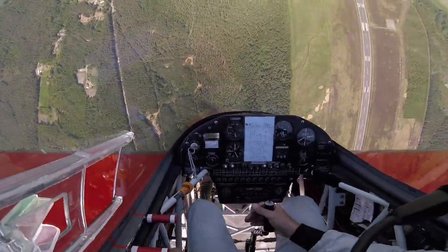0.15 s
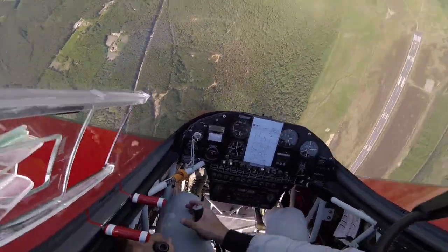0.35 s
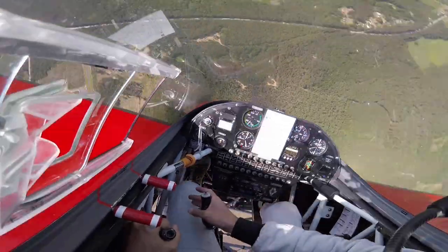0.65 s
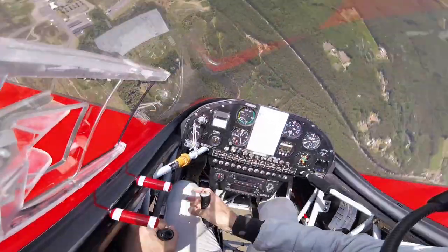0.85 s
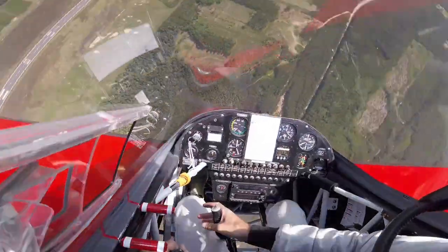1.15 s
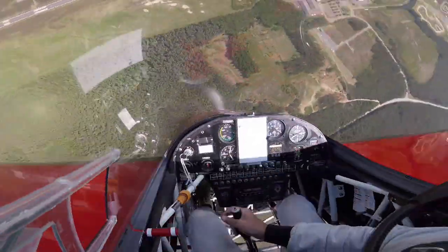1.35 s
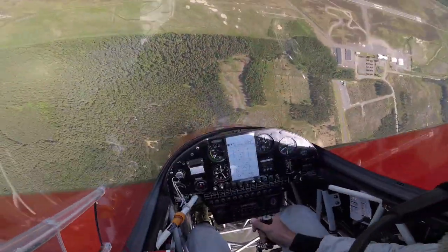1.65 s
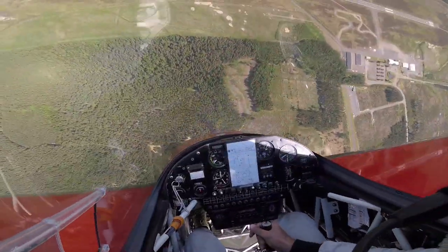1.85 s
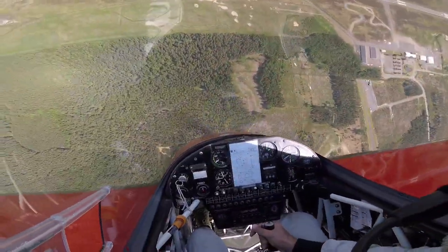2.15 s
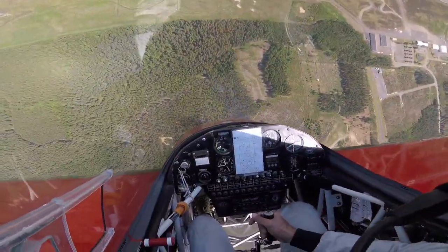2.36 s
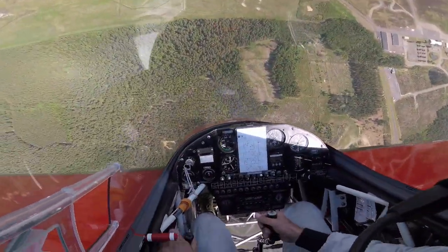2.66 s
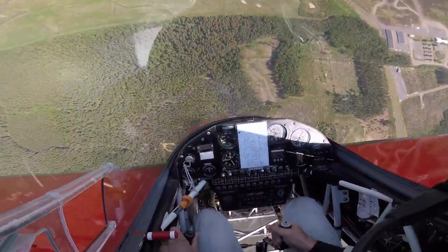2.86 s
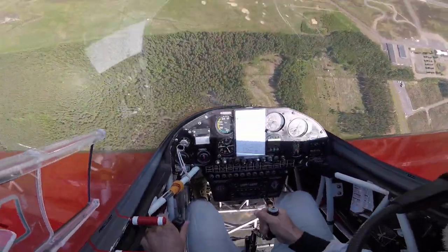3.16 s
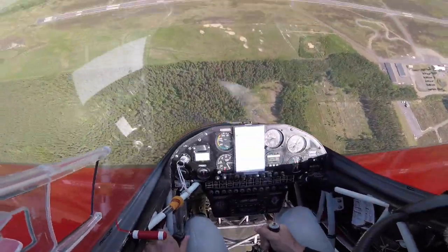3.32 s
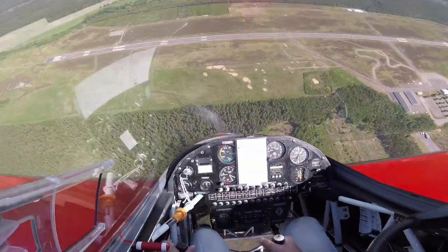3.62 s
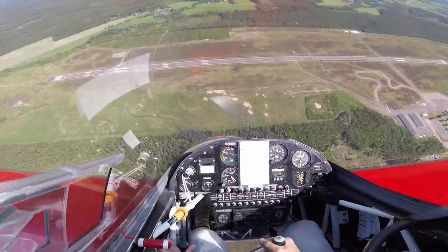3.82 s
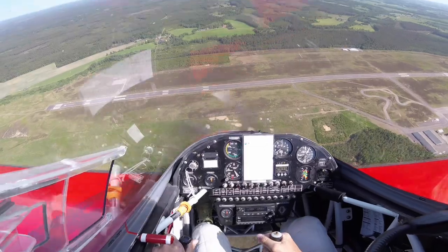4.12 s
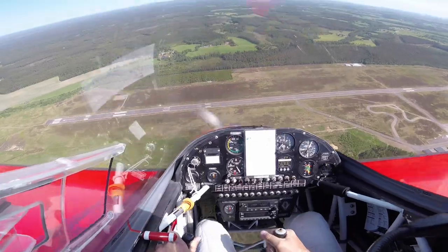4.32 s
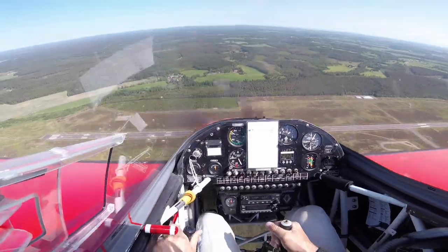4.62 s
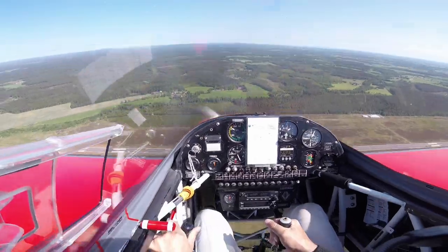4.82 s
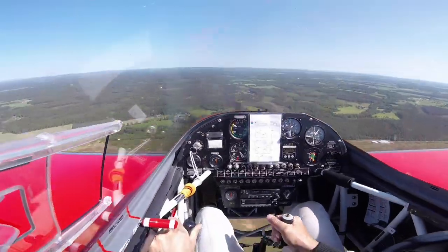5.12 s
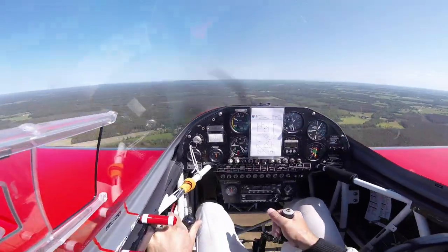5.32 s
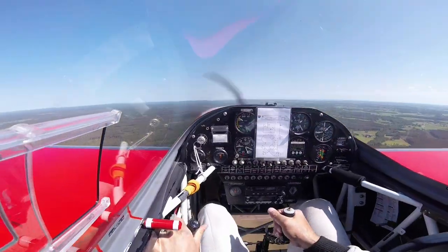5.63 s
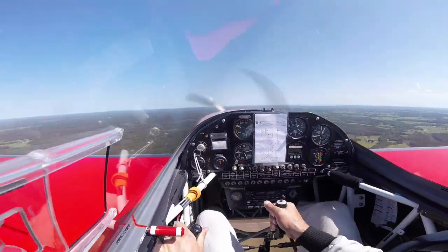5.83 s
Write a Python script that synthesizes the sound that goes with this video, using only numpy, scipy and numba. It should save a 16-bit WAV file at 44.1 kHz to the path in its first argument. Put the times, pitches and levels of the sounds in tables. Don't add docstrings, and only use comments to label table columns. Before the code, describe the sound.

Inside a small aerobatic plane, a loud low propeller drone holds nearly steady while rushing air grows and bumps rumble through the airframe.

```python
import sys
import numpy as np
from scipy import signal
from scipy.fft import rfft, irfft
from scipy.io import wavfile
from scipy.ndimage import uniform_filter1d, minimum_filter1d
from numba import njit

SR = 44100
rng = np.random.default_rng(int(sys.argv[2]) if len(sys.argv) > 2 else 0)


def transcribe(u):
    v = np.clip(np.atleast_2d(u).T, -1, 1)
    q = np.round(v * 32767).astype(np.int16)
    wavfile.write(sys.argv[1], SR, q)


def linear_from_db(decibels):
    return 10 ** (np.asarray(decibels, float) / 20)


N = 263718


def curves(table):
    time_s, *columns = np.transpose(table)
    return [np.interp(np.arange(N) / SR, time_s, column) for column in columns]


def bells(table):
    middle_s, length_s, height = np.transpose(table)[:, :, None]
    coarse = np.arange(0, N + 64, 64)
    swells = height * np.exp(-((coarse / SR - middle_s) / length_s) ** 2)
    return np.interp(np.arange(N), coarse, np.sum(swells, axis=0))


def walk(rate_hz):
    hold = int(SR / rate_hz)
    levels = np.repeat(rng.standard_normal(N // hold + 1), hold)
    return 1.193 * uniform_filter1d(uniform_filter1d(levels, hold), hold)[:N]


def wave(turns):
    return np.cos(2 * np.pi * turns)


def turbulence(shape, lo_hz, hi_hz, shared_db, own_db, rate):
    octave = np.log2(np.fft.rfftfreq(N, 1 / SR) + 1)
    pitch_hz, level_db = np.transpose(shape)
    corners = np.log2(pitch_hz)
    colour = linear_from_db(np.interp(octave, corners, level_db, left=-99, right=-99)) * rfft(rng.standard_normal(N))
    inside = (octave > np.log2(lo_hz)) & (octave < np.log2(hi_hz))
    colour = colour * N / np.sqrt(2 * np.sum(np.abs(colour[inside]) ** 2))
    swell_db = shared_db * walk(rate)
    out = 0
    for centre in np.arange(corners[0], corners[-1] + .5, .5):
        share = np.clip(1 - 2 * np.abs(octave - centre), 0, 1)
        out = out + linear_from_db(swell_db + own_db * walk(2 * rate)) * irfft(colour * share, N)
    return out


@njit
def resonance(x, hz, width):
    y, band, low = np.empty(len(x)), 0., 0.
    for i in range(len(x)):
        g, damping = np.tan(np.pi * hz[i] / SR), width[i] / hz[i]
        middle = (band + g * (x[i] - low)) / (1 + g * (g + damping))
        band = 2 * middle - band
        low = low + 2 * g * middle
        y[i] = damping * middle
    return y


# time_s, blade_rate_hz
BLADE_RATE = [(0.0, 119.81), (0.2, 123.19), (0.5, 125.08), (0.85, 123.2), (1.2, 122.88), (1.8, 122.69),
              (2.2, 123.88), (2.7, 125.41), (2.95, 124.77), (3.2, 122.25), (3.7, 122.21), (4.3, 121.74),
              (4.75, 120.92), (5.1, 120.56), (5.5, 121.49), (5.98, 122.83)]


def blade_turns():
    rate_hz = curves(BLADE_RATE)[0] * (1 + .0015 * walk(9))
    return np.cumsum(rate_hz) / SR + 0.346


# middle_s, length_s,
# strength (-0.3 # to 1, negative lifts the beat)
BUMPS = [(0.0, 0.027, -.3), (0.12, 0.093, 0.18), (0.6, 0.14, 0.7), (1.12, 0.066, 0), (1.74, .08, 0.17),
         (2.03, 0.14, 0.97), (2.4, 0.21, 0.44), (2.75, .06, 0.27), (3.45, .22, 1), (4.13, 0.094, .35),
         (4.4, 0.11, 0.36), (4.75, 0.25, 0.3), (5.25, 0.13, 0.3), (5.75, 0.21, 0.26)]


def rough_air():
    return bells(BUMPS)


# multiple_of_blade_rate, level_db, lead_turns
ENGINE_LINES = [(.5, -33, 0.12), (1.5, -38, 0.44), (4.5, -38.5, 0.66), (5.5, -38.5, 0.32), (6, -47, 0.35)]
# middle_s, length_s, depth_db
FADES = [(0.13, 0.051, -4), (0.37, .07, -6.5), (0.68, 0.045, -11.5), (1.12, 0.14, -6), (1.66, 0.1, -9.5),
         (2.12, 0.098, -17.5), (2.9, 0.16, -4.5), (3.46, 0.11, -9), (3.88, 0.092, -4), (4.75, 0.12, -4.5),
         (5.0, 0.07, -6), (5.4, .07, -2), (5.62, 0.073, -5.5), (5.98, 0.12, -2.5)]
# middle_s, length_s, gain_db
CATCHES = [
    [(0.2, .12, 7), (1.4, .35, 5), (3.3, .15, 7), (3.85, .3, 7), (5.8, .2, 5)],
    [(0.6, .4, 5), (1.25, .15, 4), (2.5, .45, 7), (3.3, .15, 4), (4.6, .3, 4)],
    [(1.0, .7, 4), (2.5, .2, 4), (3.3, .15, 4), (4.45, .3, 4), (5.5, .4, 7)],
]


def propeller(turns, bump):
    beat_db = -9.5 - 7.5 * bump + 0.36 * walk(22)
    second_db = -15.5 + bells(FADES) - 1.0
    sound = linear_from_db(beat_db) * wave(turns)
    sound = sound + linear_from_db(second_db) * wave(2 * turns - .04 + 0.089 * walk(1.4))
    lines = list(ENGINE_LINES)
    for multiple, level_db, catches in zip((3, 4, 5), (-33, -34, -36), CATCHES):
        lines.append((multiple, level_db + bells(catches) + 1.2 * walk(2.3), .4))
    flutter_db, slip_turns = 3.5, .12
    for multiple, level_db, lead in lines:
        strength = linear_from_db(level_db + flutter_db * walk(9))
        sound = sound + strength * wave(multiple * turns + lead + slip_turns * walk(5))
    return np.sqrt(2) * sound


# pitch_hz, level_db (per Hz)
BUFFET = [(70, -26), (105, -2.5), (150, 1), (215, -1.5), (290, -4), (345, -1.5), (450, -5.5), (600, -21),
          (900, -36)]


def fuselage_buffet(bump):
    return linear_from_db(-20.5 + 2 * bump) * turbulence(BUFFET, 147, 215.7, shared_db=-0.5, own_db=0.2, rate=9)


# time_s, airspeed (0 to 1), sideslip (0 to 1)
AIR = [(0.0, 0, 0.15), (0.6, 0.21, 0.03), (1.2, .25, .3), (1.65, 0.22, 0.17), (2.2, 0.67, 0.94),
       (2.5, 0.4, 0.8), (2.95, .45, 0.65), (3.2, 0.5, 0.34), (3.45, 0.62, 0.45), (4.0, 0.9, 0.34),
       (4.6, 0.96, 0.08), (5.2, 0.97, .1), (5.7, 1, 0.23), (5.98, 0.99, 0.65)]


def air_db(slow_db, speed_db, slip_db):
    speed, slip = curves(AIR)
    return slow_db + speed_db * speed + slip_db * slip


# pitch_hz, level_db (per Hz)
ROAR = [(350, -17), (520, 2), (660, -0.5), (800, -4), (1100, -9.5), (1500, -24)]


def canopy_roar(turns):
    puffs = 1 + 0.019 * wave(turns)
    air = turbulence(ROAR, 556, 1200, shared_db=-0.2, own_db=1.16, rate=9)
    return linear_from_db(air_db(-25.5, 5, 3) - 3.0) * puffs * air


# pitch_hz, level_db (per Hz)
SEAL = [(900, -22.5), (1250, 0), (1600, 0.5), (1950, -5.5), (2300, -7), (2800, -8), (3300, -14),
        (3900, -25), (4600, -39)]


def seal_hiss():
    air = turbulence(SEAL, 1210, 3300, shared_db=-0.1, own_db=0.15, rate=11)
    return linear_from_db(air_db(-38.5, 9.5, -1)) * air


# time_s, centre_hz, width_hz
PORT = [(0, 5680, 1000), (1.5, 5950, 900), (3, 6046, 798.9), (4, 6220, 600), (5.98, 6200, 600)]
# middle_s, length_s, gain_db
HEAD_TURNS = [(0.15, .1, 0.5), (0.41, 0.046, 5), (0.56, 0.077, -1), (1.08, 0.14, 4), (1.55, .15, -3),
              (1.9, .1, 0), (2.9, 0.18, 3)]


def port_ring(port_db):
    hz, width = curves(PORT)
    turn_db = bells(HEAD_TURNS)
    hz = hz * (1 + 0.0077 * walk(23) - .004 * turn_db)
    width = width * (1 + .1 * turn_db)
    wide = resonance(rng.standard_normal(N), hz, 2.1 * width)
    ring = resonance(wide, hz, width) * np.sqrt(SR / (2.0 * width))
    return linear_from_db(port_db - 1.0 + turn_db + 0.36 * walk(25.07)) * ring


# pitch_hz, level_db (per Hz)
TOP = [(1800, -13), (2800, 5), (4200, -2.5), (5500, 1), (7500, 0.5), (9600, -3), (10400, -10),
       (11200, -19.5), (12000, -31), (12600, -41)]


def high_hiss(top_db):
    return linear_from_db(top_db) * turbulence(TOP, 7440, 11000, shared_db=0.0, own_db=0.5, rate=11)


# pitch_hz, level_db (per Hz)
EDGE = [(9200, -3), (10200, 12.5), (11000, 7.5), (11500, 5), (12000, -4), (12700, 2), (13900, -4),
        (14500, -6), (15200, -23)]


def highest_hiss(port_db, top_db):
    air = turbulence(EDGE, 12300, 14000, shared_db=1.1, own_db=-1.5, rate=25)
    return linear_from_db(0.48 * port_db + 0.54 * top_db - 22) * air


def slipstream(turns, bump):
    port_db, top_db = air_db(-49.5, 6.5, 4.5), air_db(-50.5, 0, 4.5)
    gust = linear_from_db(0.23 * walk(30))
    hiss = seal_hiss() + port_ring(port_db) + high_hiss(top_db) + highest_hiss(port_db, top_db)
    return fuselage_buffet(bump) + canopy_roar(turns) + gust * hiss


# pitch_hz, level_db (per Hz)
RUMBLE = [(8, -27), (20, -14), (40, -2.5), (52, -5), (62, 0), (90, 4.5), (115, -5), (160, -32)]


def airframe_rumble(bump):
    return linear_from_db(-25 + 8 * bump) * turbulence(RUMBLE, 40, 100, shared_db=0.0, own_db=0.3, rate=6)


def canopy_gap():
    pull_s, pull_rise_s, ease_s, ease_fall_s = 3.25, 0.11, 4.8, 0.61
    gap_hz, gap_width_hz, gap_db = 1636, 280, -35
    t = np.arange(N) / SR
    load = 1 / (1 + np.exp((pull_s - t) / pull_rise_s))
    load = load / (1 + np.exp((t - ease_s) / ease_fall_s))
    hz, width = gap_hz * (1 + 0.048 * walk(6)), np.full(N, float(gap_width_hz))
    air = resonance(resonance(rng.standard_normal(N), hz, 2 * width), hz, width)
    return load * linear_from_db(gap_db + 1.3 * walk(12)) * air / np.std(air)


def scene():
    turns = blade_turns()
    bump = rough_air()
    mix = propeller(turns, bump) + slipstream(turns, bump) + airframe_rumble(bump) + canopy_gap()
    return mix[None]


@njit
def follower(x, attack, release):
    levels, level = np.empty(len(x)), .5
    for i in range(len(x)):
        peak = abs(x[i])
        level += (peak - level) * (attack if peak > level else release)
        levels[i] = level
    return levels


def top_cut(x):
    return signal.sosfilt(signal.butter(12, 14987, fs=SR, output="sos"), x)


def record(dry):
    ceiling, release_s = 0.94, .04
    loud = dry[0] * linear_from_db(-0.22)
    ahead = -minimum_filter1d(-np.abs(loud), size=90)
    level = uniform_filter1d(follower(ahead, .3, 1 / (release_s * SR)), size=40)
    held = loud * ceiling / np.maximum(level, ceiling)
    return top_cut(held[None])


dry = scene()
out = record(dry)
transcribe(out)
```